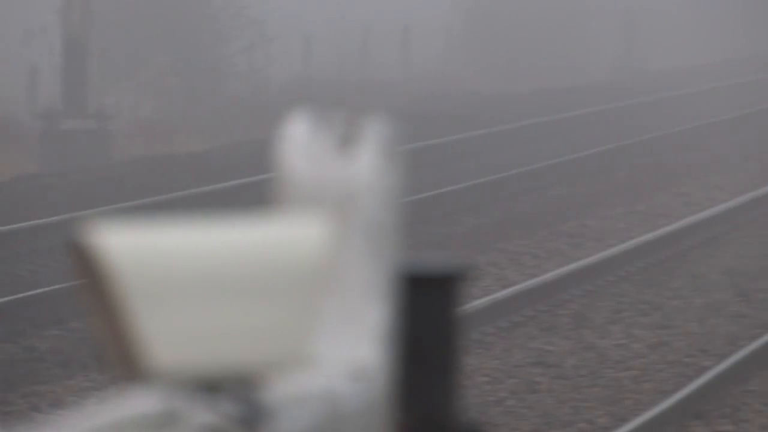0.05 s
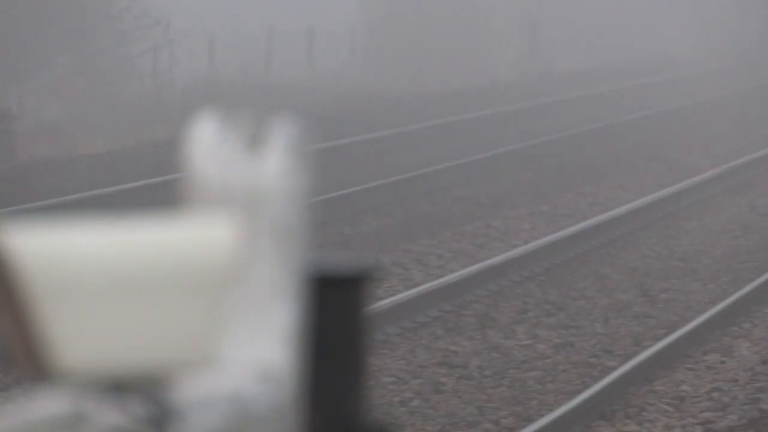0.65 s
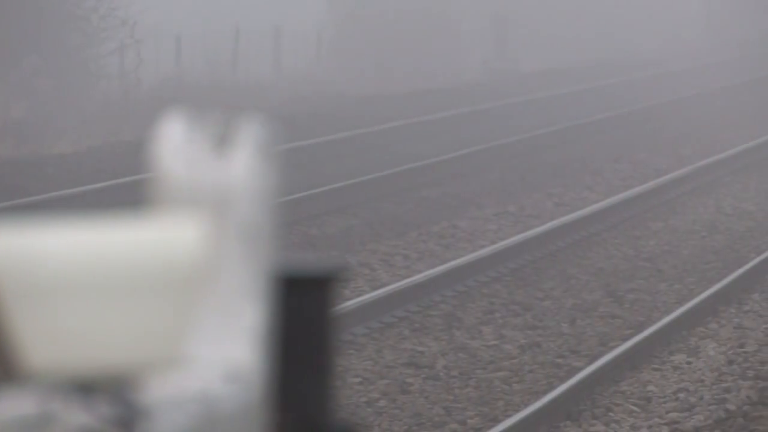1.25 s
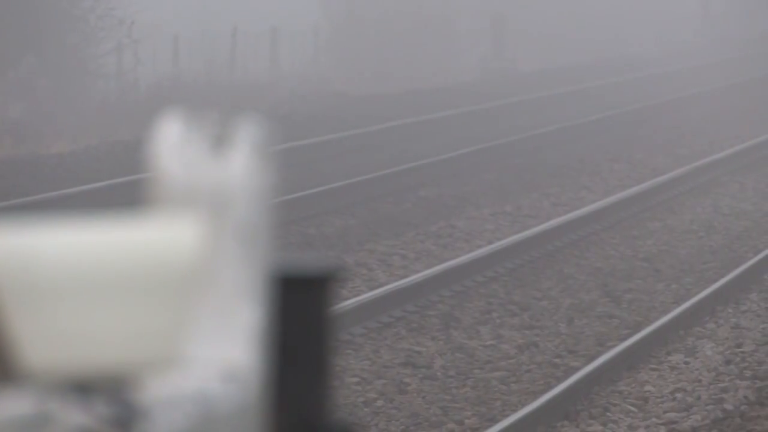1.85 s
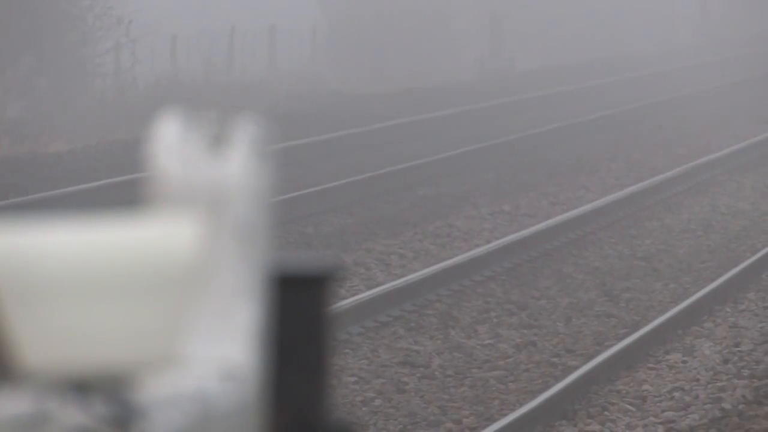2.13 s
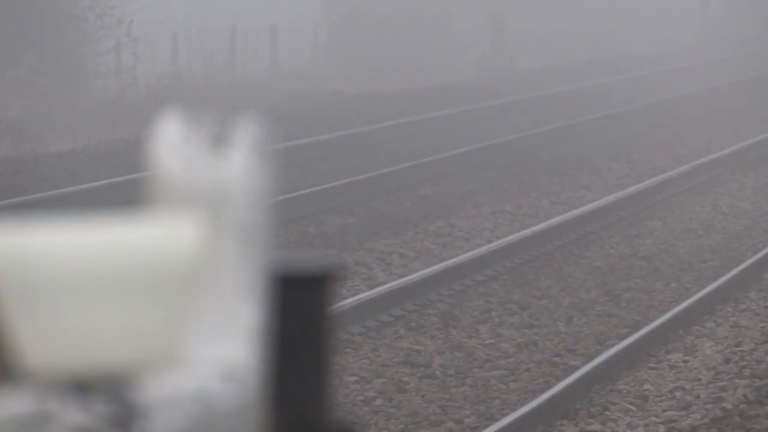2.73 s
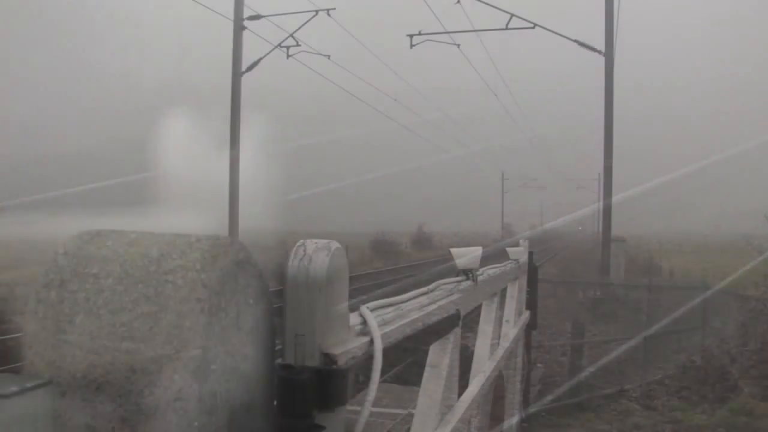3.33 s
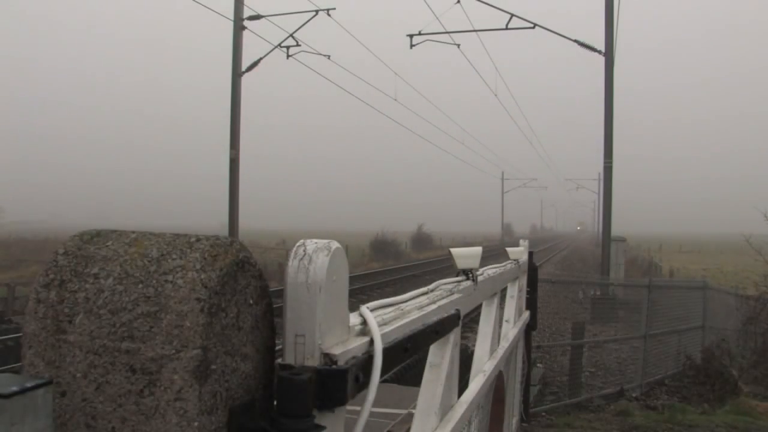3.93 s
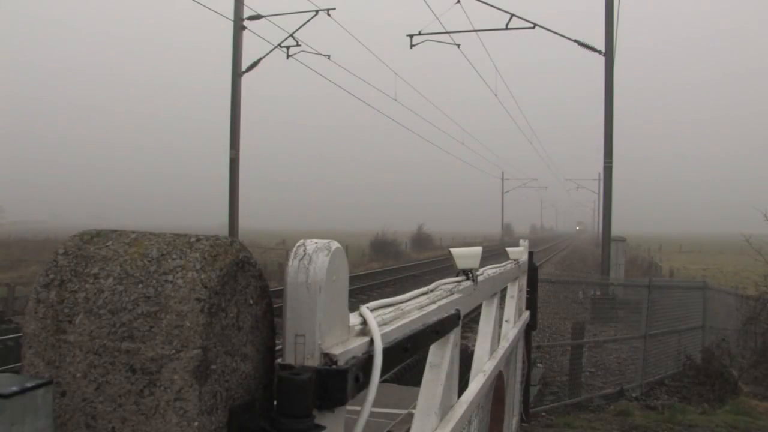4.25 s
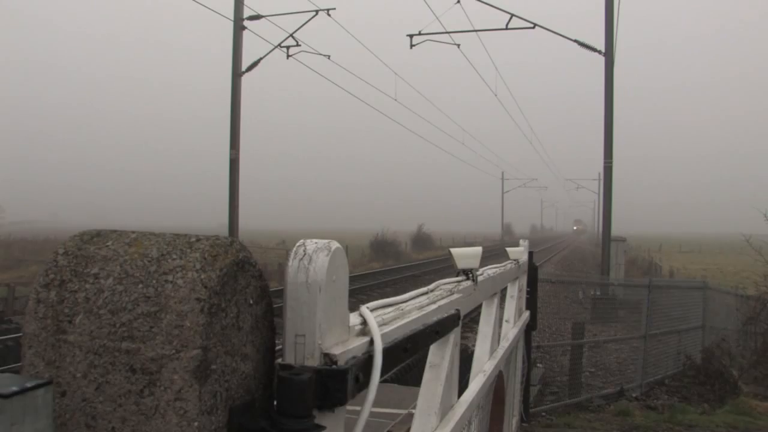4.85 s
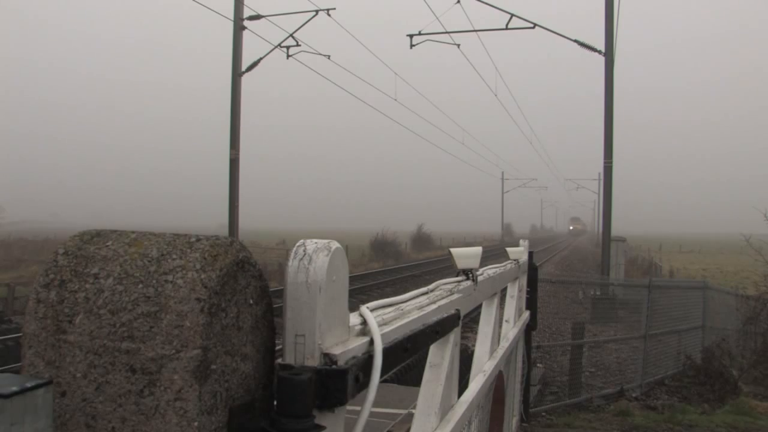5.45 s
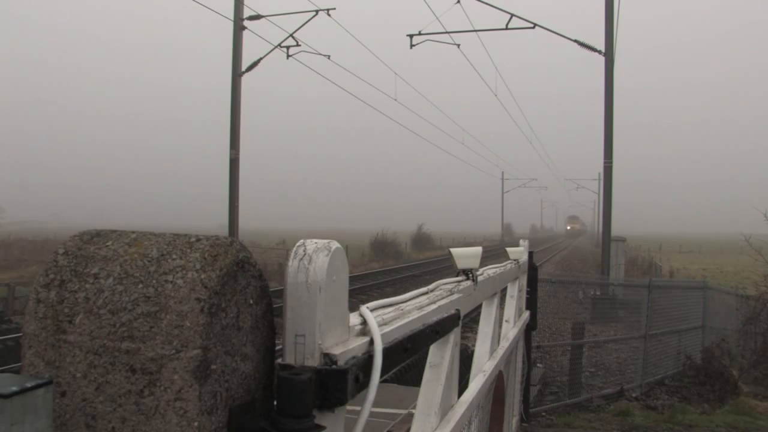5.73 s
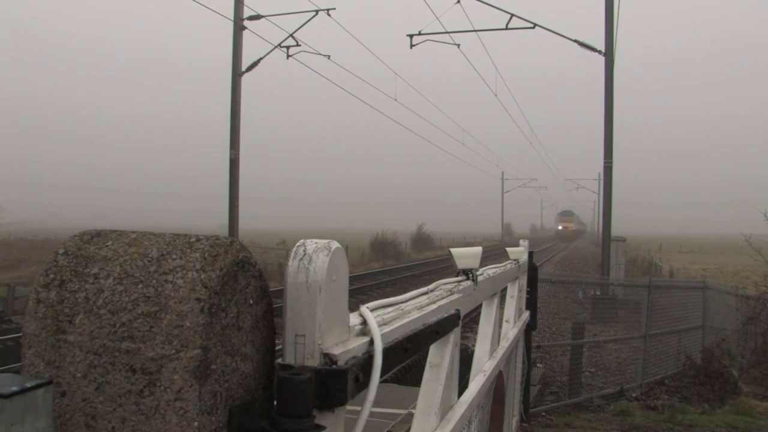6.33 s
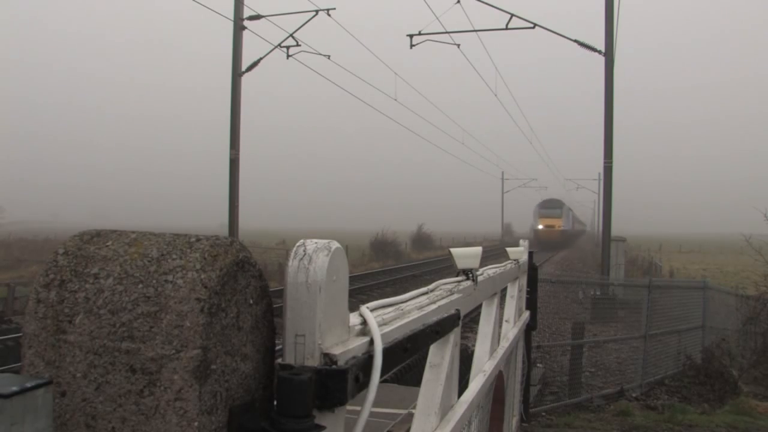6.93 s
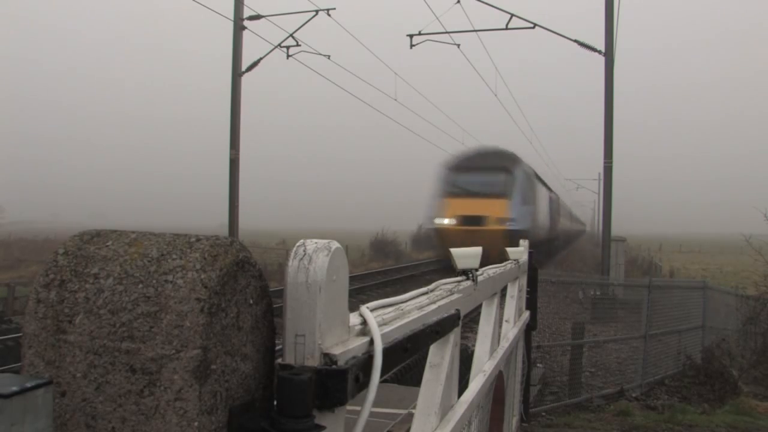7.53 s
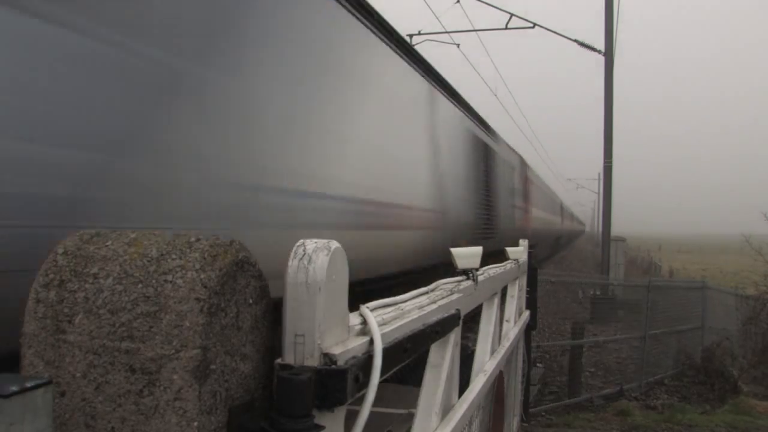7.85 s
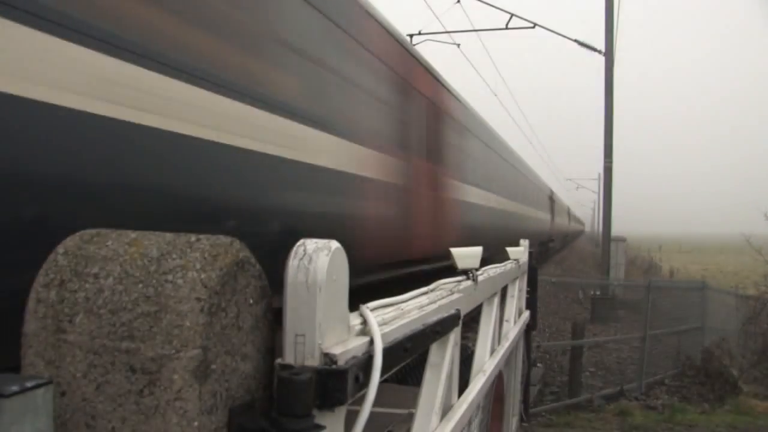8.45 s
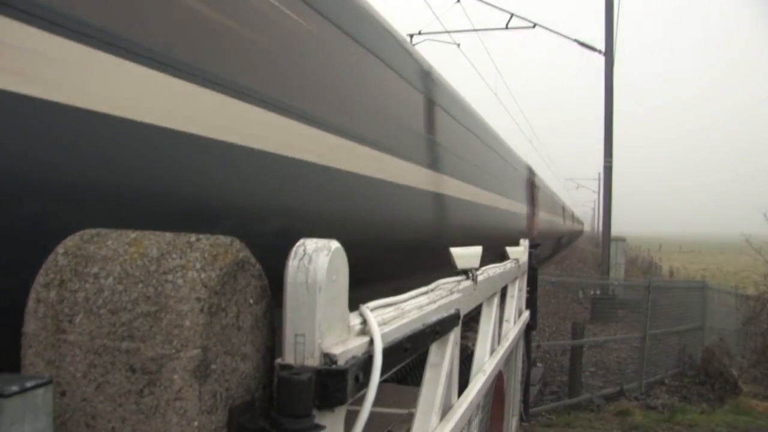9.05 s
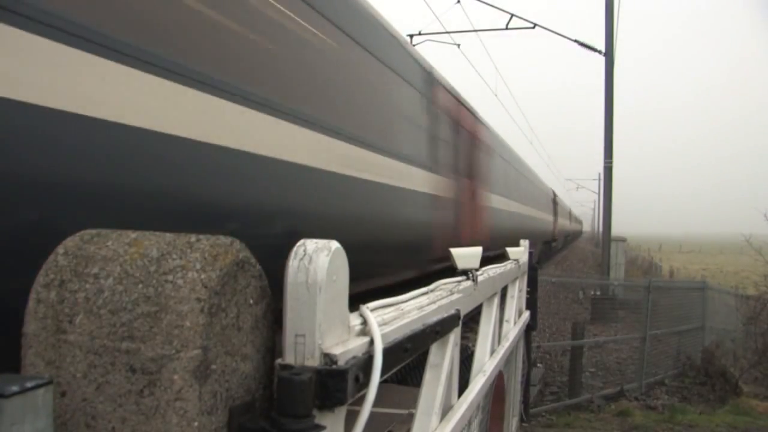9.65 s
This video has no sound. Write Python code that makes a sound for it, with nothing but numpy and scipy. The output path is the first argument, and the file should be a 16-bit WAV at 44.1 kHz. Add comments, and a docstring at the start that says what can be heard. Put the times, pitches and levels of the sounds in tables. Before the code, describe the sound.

Rails ring and a diesel engine hums louder until a fast passenger train tears by, its coaches rumbling and clattering.

```python
"""At a level crossing, a diesel express comes out of the fog and tears past close by.
Ahead of it the exhaust drones with its periodic firing, and the rails, excited by rough wheels, sing.
The nose goes by in a rush of air and the Doppler effect lowers the engine note. The bogies of the
coaches then roar past in waves, and wheel impacts ring the damped modes of the track."""
import sys
import numpy as np
from scipy import signal
from scipy.fft import irfft
from scipy.io import wavfile
from scipy.ndimage import uniform_filter1d, minimum_filter1d

SR = 44100
rng = np.random.default_rng(int(sys.argv[2]) if len(sys.argv) > 2 else 0)


def transcribe(u):
    """Save the signal u as a 16-bit wav file named by the first command-line argument.

    u: samples, shape (n,) or (channels, n), limited to [-1, 1]; the rate is SR.
    q: integer samples, one column per channel.
    """
    v = np.clip(np.atleast_2d(u).T, -1, 1)
    q = np.round(v * 32767).astype(np.int16)
    wavfile.write(sys.argv[1], SR, q)


N = 427769
TIME = np.arange(N) / SR
FRAME_S = np.arange(N // 256 + 5) * 256 / SR
BIN_HZ = np.fft.rfftfreq(1024, 1 / SR)
NOSE_S = 7.87  # the nose reaches the listener


def amp(db):
    """Amplitude ratio of a level in decibels."""
    return 10 ** (np.asarray(db) / 20)


def unit_rms(x):
    """Normalisation to an rms of 1."""
    return x / np.sqrt(np.mean(x ** 2) + 1e-20)


def ramp(t, start, length):
    """Linear rise from 0 to 1."""
    return np.clip((t - start) / length, 0, 1)


def swell(t, peak_s, half_width_s):
    """Bell-shaped envelope with a peak of 1."""
    return 1 / (1 + ((t - peak_s) / half_width_s) ** 4)


def spectrum(points, hz=BIN_HZ):
    """Linear interpolation over log frequency."""
    f, value = np.transpose(points)
    return np.interp(np.log(hz + 1), np.log(f + 1), value)


def drift(top_hz, t):
    """Random modulation of rms 1: a superposition of slow sinusoids."""
    hz = top_hz * np.geomspace(1 / 10, 1, 20)[:, None]
    waves = np.sin(2 * np.pi * (hz * FRAME_S + rng.random(hz.shape))) / hz ** 0.15
    return np.interp(t, FRAME_S, unit_rms(waves.sum(0)))


def panned(db):
    """Two channel gains for a level difference, left minus right."""
    return amp(np.array([db, -db]) / 2)


# Sound fields from ahead and from alongside, three curves each: (frequency [Hz], coherence [ratio]),
# (frequency [Hz], left minus right [dB]), (frequency [Hz], phase lead of left [rad])
FIELD_AHEAD = ([(150, 1), (400, 1), (930, 0.98), (2300, 0.78), (6000, 0.82), (14000, 0.76)], [(150, -0.5),
               (930, -2.5), (5000, -1.2)], [(100, 0), (10000, 0)])
FIELD_BESIDE = ([(100, 0.99), (300, 1), (930, 0.82), (2300, 0.59), (6000, .42), (14000, 0.3)], [(350, 0.5),
                (930, 3.3), (2300, 3.9), (6000, 0.5)], [(200, 0), (1000, 0.00004), (2500, 0.7),
                (4200, 0.055)])
def noise(colour_db, level_db, field, flicker_db, band_hz=(0, SR), pan_db=0):
    """Partially coherent stereo noise with a flickering spectrum; level_db applies within band_hz."""
    shape = (len(FRAME_S), len(BIN_HZ))
    a, b, c, d = rng.standard_normal((4, *shape))
    coherence, balance_db, lead = (spectrum(points) for points in field)
    coherence = np.clip(coherence, 0, 1)
    left = a + 1j * b
    right = (coherence * left + np.sqrt(1 - coherence ** 2) * (c + 1j * d)) * np.exp(-1j * lead)
    colour = amp(colour_db) * np.ones(shape)
    in_band = (BIN_HZ > band_hz[0]) & (BIN_HZ < band_hz[1])
    colour /= np.sqrt((colour[:, in_band] ** 2).sum(1, keepdims=True))
    flicker = uniform_filter1d(rng.standard_normal(shape), 8, axis=0)
    flicker = unit_rms(uniform_filter1d(flicker, 12, axis=1))
    gain = colour * amp(level_db[:, None] + flicker_db * flicker)
    frames = np.array([left, right]) * gain * panned(balance_db + pan_db + np.zeros(shape))
    _, sound = signal.istft(frames.swapaxes(1, 2), nperseg=1024, noverlap=768)
    return sound[:, :N] * np.sqrt(3 / 2)


def nearness(t):
    """Stage of the approach: 0 far, 1 nearer, 2 near."""
    return np.interp(t, [3.6, 4.35, 5.6, 6.5], [0, 1, 1.2, 2])


# Loudness of the oncoming train: (time [s], level [dB])
APPROACH = [(0, -41), (0.6, -39), (1.7, -39), (3, -37.5), (3.85, -34.5), (4.1, -31.5), (4.65, -28),
            (5.2, -27), (5.7, -24.5), (6.05, -21), (6.45, -14.5), (7.2, -14.5), (7.75, -14.5)]
def carried_db(t, shares_db, fade_db_per_s, hold_s=0):
    """Level rises as distance shrinks, then fades behind the nose; shares are (far, nearer, near)."""
    approach_db = np.interp(t, *np.transpose(APPROACH))
    share_db = np.interp(nearness(t), [0, 1, 2], shares_db)
    return approach_db + share_db - fade_db_per_s * np.maximum(t - NOSE_S - hold_s, 0)


# Wind buffeting: (frequency [Hz], relative density [dB])
GUST_SPECTRUM = [(40, -14), (100, -4), (300, 0), (600, -5), (1200, -22), (4000, -55)]
# Its nearly incoherent field: curves and units as in FIELD_AHEAD
FIELD_WIND = ([(100, 0.1), (10000, 0.1)], [(100, 0), (10000, 0)], [(100, 0), (10000, 0)])
def slipstream(peak_s=8.05, rise_s=0.045, peak_db=-24, fade_db_per_s=50):
    """Turbulence behind the nose buffets each microphone separately and dies away."""
    onset_db = -20 * (np.maximum(peak_s - FRAME_S, 0) / rise_s) ** 2
    decay_db = -fade_db_per_s * np.maximum(FRAME_S - peak_s, 0)
    level_db = np.maximum(peak_db + onset_db + decay_db, -150)
    return noise(spectrum(GUST_SPECTRUM), level_db, FIELD_WIND, flicker_db=-0.5)


# Short swells: (time [s], half-width [s], centre frequency [Hz], half-bandwidth [octaves], level [dB])
RUSHES = [(3.45, 0.59, 2970, 0.31, -52), (4.33, 0.049, 3450, .22, -45), (4.4, 0.54, 960, 0.21, -40),
          (7.884, 0.056, 303, 0.47, -17), (8.222, 0.059, 1780, 0.1, -19), (8.984, 0.075, 3560, 0.25, -26.5),
          (9.43, 0.045, 3540, 0.31, -28)]
def rushes():
    """Band-limited noise: the rails flare, air rushes round the power car, wheels scrape."""
    out = 0
    for peak_s, half_width_s, hz, octaves, db in RUSHES:
        offset = np.log2((BIN_HZ + 1) / hz) / octaves
        colour_db = -20 * np.log10(1 + offset ** 4 / 2)
        level_db = db + 20 * np.log10(swell(FRAME_S, peak_s, half_width_s))
        out += noise(colour_db, level_db, FIELD_BESIDE, flicker_db=2.5)
    return out


def cooling_fan(pass_s=7.985, length_s=0.028, hz=1045, hz_per_s=-2500, db=-18):
    """Tonal fan noise: a brief whine that glides down as the grille passes."""
    phase = 2 * np.pi * np.cumsum(hz + hz_per_s * (TIME - pass_s)) / SR
    envelope = amp(db) * np.exp(-((TIME - pass_s) / length_s) ** 2)
    return np.sqrt(2) * envelope * np.sin(phase)


def lineside_echo(start_s=5.5, hz=120, hz_per_s=-10):
    """Oblique reflection returns the drone at a lower pitch, so it beats with the direct sound."""
    phase = 2 * np.pi * np.cumsum(hz + hz_per_s * (TIME - start_s)) / SR
    envelope = ramp(TIME, start_s, 4) * (1 - ramp(TIME, NOSE_S - 0.4, 0.3))
    return np.sqrt(2) * envelope * amp(drone_db() - 10) * np.sin(phase)


# Rolling noise at three distances: (frequency [Hz], relative density [dB])
RAIL_FAR = [(22, -4), (43, 5.5), (90, -22), (150, -12), (300, -3), (430, -8), (860, 0), (1200, -4),
            (1600, -7), (2400, -13.5), (2700, -18), (3600, -23), (4900, -39), (14000, -48.5)]
RAIL_NEARER = [(22, -12), (43, 7), (90, -5), (170, -7.5), (480, -4.5), (900, -1.5), (1250, -6), (1850, 1.5),
               (2400, -1.5), (2750, -12), (4000, -16.5), (5200, -34.5), (9500, -52.5), (14000, -43)]
RAIL_NEAR = [(22, -30), (45, -26), (80, 1.5), (170, -1), (400, -7), (900, -0.5), (1300, -3), (1800, 1.5),
             (2450, -3.5), (2750, -10.5), (4100, -14.5), (5300, -29.5), (8500, -32.5), (11000, -48.5),
             (14000, -46)]
def rails(ring_hz=6510, half_width_hz=180, ring_db=8.6):
    """Attenuation with distance: rolling noise brightens as less rail and air lie between."""
    stage = nearness(FRAME_S)[:, None]
    colour_db = sum(np.maximum(1 - abs(stage - k), 0) * spectrum(points)
                    for k, points in enumerate([RAIL_FAR, RAIL_NEARER, RAIL_NEAR]))
    resonance_db = ring_db / (1 + ((BIN_HZ - ring_hz) / half_width_hz) ** 2)
    colour_db += np.minimum(stage, 1) * resonance_db
    level_db = carried_db(FRAME_S, (-2.18, -2.33, -4), fade_db_per_s=111) + 0.5 * drift(35, FRAME_S)
    return noise(colour_db, level_db, FIELD_AHEAD, flicker_db=1.19, band_hz=(500, 5000))


# Tread roughness of coach and power car wheels, heard via the rails: (frequency [Hz], relative level [dB])
COACH_TREAD = [(500, -30), (800, -3), (895, 0), (980, -3), (1060, -9), (1170, -4), (1400, -8), (1950, -1),
               (2180, 3.5), (2300, -7), (2400, 2), (2525, 2.5), (2600, -12), (2850, -7), (3050, -15),
               (4000, -45)]
POWER_TREAD = [(900, -26), (1310, -20), (1360, -6), (1470, -11), (1570, -2), (1597, 7), (1650, -6),
               (1745, 3), (1835, 2.5), (1890, -1), (1925, -12), (2800, -28)]
def singing(tread, turn_hz, shares_db, rate_spread=0.0013):
    """Periodic excitation: tread bumps recur every wheel turn, giving a comb of metallic harmonics."""
    hz = np.arange(2049) * turn_hz
    harmonics = amp(spectrum(tread, hz)) * (hz > tread[0][0]) * (hz < tread[-1][0])
    turns = turn_hz * TIME + 0.0027 * drift(3, TIME)
    axles = np.zeros((2, N))
    for side in np.linspace(-1, 1, 4):
        one_turn = irfft(harmonics * np.exp(2j * np.pi * rng.random(len(hz))))
        place = turns * (1 + rate_spread * rng.standard_normal()) % 1
        axle = np.interp(place, np.arange(len(one_turn)) / len(one_turn), one_turn, period=1)
        fading = np.cos(0.57 * drift(1.246, TIME) + np.pi * rng.random())
        axles += panned(3.6 * side)[:, None] * axle * fading
    pan_db = 8 * ramp(TIME, 6.16, 0.6) - 0.8  # moves left as the train comes close
    return amp(carried_db(TIME, shares_db, fade_db_per_s=55)) * unit_rms(axles) * panned(pan_db)


def cycle_hz(start_hz=14.25, full_hz=14.97, full_speed_s=1.35, mach=0.15, pass_s=8.1, fall_s=0.13):
    """Doppler effect: the engine's cycle rate, given as heard from ahead, falls as the exhaust passes."""
    ahead_hz = start_hz + (full_hz - start_hz) * ramp(TIME, 0, full_speed_s)
    return ahead_hz * (1 - mach) / (1 + mach * np.tanh((TIME - pass_s) / fall_s))


def load_db(idle_db, full_load_s=2.9):
    """Radiation grows with engine load: the level offset rises from idle_db to 0."""
    return idle_db * (1 - ramp(TIME, 0, full_load_s))


def drone_db():
    """The firing note grows with load and proximity, and decays behind the power car."""
    return carried_db(TIME, (-6, -6, -6), fade_db_per_s=99, hold_s=0.13) + load_db(-13)


# Partials of the uneven cylinders: (order [multiple of the cycle rate], relative level [dB])
ENGINE_ORDERS = [(3, -0.5), (5, 1.5), (6, 3), (7, -13), (10, -8), (11, -9), (12, -10), (13, -11), (14, -8),
                 (17, 4.5), (18, 3), (19, -0.5), (20, 1.5), (21, -10), (25, -3.5), (29, -3.5)]
# The drone sags twice, then the power car screens it: (time [s], half-width [s], level change [dB])
DRONE_DIPS = [(2.1, .25, -5), (7.3, .15, -3.5), (7.915, .04, -22)]
def exhaust(firings_per_cycle=8):
    """Harmonic series: regular firing gives the drone, and unequal cylinders add a throb each cycle."""
    cycle_phase = 2 * np.pi * np.cumsum(cycle_hz()) / SR
    dips_db = sum(db * swell(TIME, s, half_width_s) for s, half_width_s, db in DRONE_DIPS)
    firing_db = drone_db() + dips_db + 0.6 * drift(8, TIME)
    drone = np.sqrt(2) * amp(firing_db) * np.cos(firings_per_cycle * cycle_phase)
    throb = 0
    for order, db in ENGINE_ORDERS:
        phase = order * cycle_phase + 0.78 * rng.standard_normal() + 0.47 * drift(4, TIME)
        throb += amp(db) * np.cos(phase)
    throb_db = carried_db(TIME, (-7, -7, -14), fade_db_per_s=40) + load_db(-4.5)
    return drone + amp(throb_db) * unit_rms(throb)


# Wheel impacts: (time [s], peak level before panning [dB])
KNOCKS = [(8.296, -7), (8.382, -10.5), (8.797, -9.5), (9.145, -12), (9.204, -8.5), (9.624, -7)]
# Modes of rail and sleeper: (frequency [Hz], relative level [dB], time to decay by 60 dB [s])
TRACK_MODES = [(572, 3, 0.1), (648, 9, 0.05), (816, -18, 0.033), (1140, -2, 0.025), (2100, -13, .015)]
def knocks(contact_s=0.001):
    """Impact excitation: each blow of a wheel sets the track into damped free vibration."""
    out, t = np.zeros(N), np.arange(SR // 10) / SR
    onset = 1 - np.exp(-(t / contact_s) ** 2)
    for start_s, peak_db in KNOCKS:
        detunes = 1 + 0.046 * rng.standard_normal(len(TRACK_MODES))
        ring = onset * sum(amp(db - 60 * t / t60) * np.sin(2 * np.pi * hz * detune * t)
                           for (hz, db, t60), detune in zip(TRACK_MODES, detunes))
        part = out[round(start_s * SR):][:len(t)]
        part += (amp(peak_db) * ring / abs(ring).max())[:len(part)]
    return out * panned(5.5)[:, None]


def alongside_db(bogie_times, bogie_dbs, steady_db, nose_db, half_pass_s=0.059, rise_db_per_s=37):
    """Incoherent sources add in power: the oncoming nose, a steady rush and each passing bogie."""
    arrived = ramp(FRAME_S, NOSE_S - half_pass_s, half_pass_s)
    nose = amp(nose_db - rise_db_per_s * abs(NOSE_S - FRAME_S)) ** 2 * (1 - arrived)
    steady = amp(steady_db) ** 2 * arrived
    bogies = sum(amp(db) ** 2 * swell(FRAME_S, s, half_pass_s) for s, db in zip(bogie_times, bogie_dbs))
    return 10 * np.log10(nose + steady + bogies * ramp(FRAME_S, NOSE_S - 1, 1) + 1e-20)


# Body roar, wheel noise, and hiss of wheels and air: (frequency [Hz], relative density [dB])
BODY_SPECTRUM = [(22, -36), (50, 0.5), (120, -4.5), (200, -4), (330, -3.5), (450, -2), (640, 0.5),
                 (1000, -0.5), (1400, -10.5), (2500, -11.5), (6000, -70)]
WHEEL_SPECTRUM = [(500, -13), (1000, -5), (1400, -3), (2100, 0.5), (2750, -14), (4200, -19.5), (5200, -32),
                  (9000, -43.5)]
HISS_SPECTRUM = [(1500, 16), (3000, 12), (4000, 9.5), (5200, -0.5), (6500, 0), (9000, -3.5), (11000, -12),
                 (14500, -32)]
# Bogies, two for the power car and a pair at each coupling: (time [s], wheel level [dB], hiss level [dB])
BOGIES = [(7.846, -28, -39.5), (7.968, -17.5, -34), (8.169, -13, -32), (8.287, -16.5, -41),
          (8.586, -19.5, -41.5), (8.72, -20.5, -40), (8.998, -20.5, -39.5), (9.138, -20, -41),
          (9.428, -19.5, -39.5), (9.559, -20.5, -41)]
def coaches(steady_hiss_db=-51):
    """Moving broadband sources: roar, wheel noise and hiss peak at each bogie's closest approach."""
    times, wheel_dbs, hiss_dbs = np.transpose(BOGIES)
    body_db = alongside_db(times, np.full(len(times), -21), steady_db=-21, nose_db=-20.5)
    wheel_db = alongside_db(times, wheel_dbs, steady_db=-28, nose_db=-28)
    hiss_db = alongside_db(times, hiss_dbs, steady_hiss_db, nose_db=-38.5)
    body = noise(spectrum(BODY_SPECTRUM), body_db, FIELD_BESIDE, flicker_db=1.2, band_hz=(300, 1100))
    wheels = noise(spectrum(WHEEL_SPECTRUM), wheel_db, FIELD_BESIDE,
                   flicker_db=2.03, band_hz=(1300, 2600))
    leftward_db = 0.24 * np.maximum(hiss_db - steady_hiss_db, 0) * ramp(FRAME_S, NOSE_S, 0.44)
    hiss = noise(spectrum(HISS_SPECTRUM), hiss_db, FIELD_BESIDE,
                 flicker_db=1.3, band_hz=(5000, 14000), pan_db=leftward_db[:, None])
    return body + wheels + hiss


def scene():
    """Superposition of engine, wheels, track and wind."""
    engine = (exhaust() + lineside_echo() + cooling_fan()) * panned(-0.3)[:, None]
    coach_wheels = singing(COACH_TREAD, turn_hz=21.23, shares_db=(-7.5, -4, -10))
    power_wheels = singing(POWER_TREAD, turn_hz=18.35, shares_db=(-23, -15.5, -6.5))
    return engine + coach_wheels + power_wheels + rails() + coaches() + rushes() + knocks() + slipstream()


def record(dry, dip_s=7.948, dip_length_s=0.012, dip_db=-11, low_hz=33, high_hz=14900, ceiling=0.97):
    """The level dips briefly as the nose passes; high-pass filter, peak limiter and low-pass follow."""
    dipped = dry * amp(dip_db * np.exp(-((TIME - dip_s) / dip_length_s) ** 2))
    trimmed = signal.sosfilt(signal.butter(4, low_hz, "highpass", fs=SR, output="sos"), dipped)
    headroom = np.minimum(1, ceiling / (abs(trimmed).max(0) + 1e-9))
    limited = trimmed * uniform_filter1d(minimum_filter1d(headroom, size=301), size=301)
    lowpass = signal.firwin(511, high_hz, window=("kaiser", 9), fs=SR)
    return signal.oaconvolve(limited, lowpass[None], "same")


dry = scene()
out = record(dry)
transcribe(out)
```